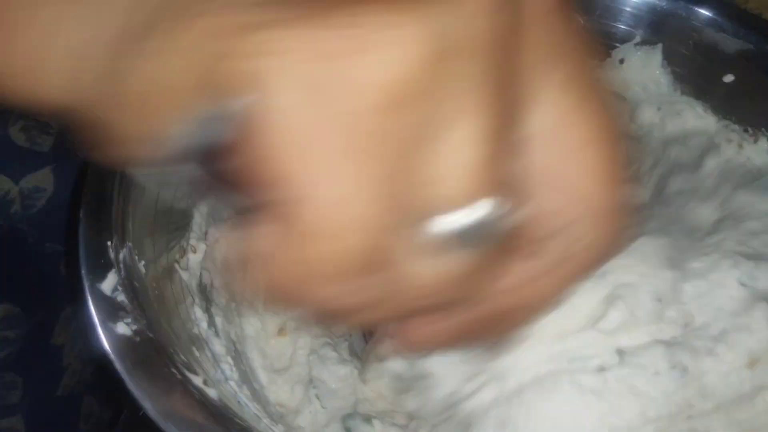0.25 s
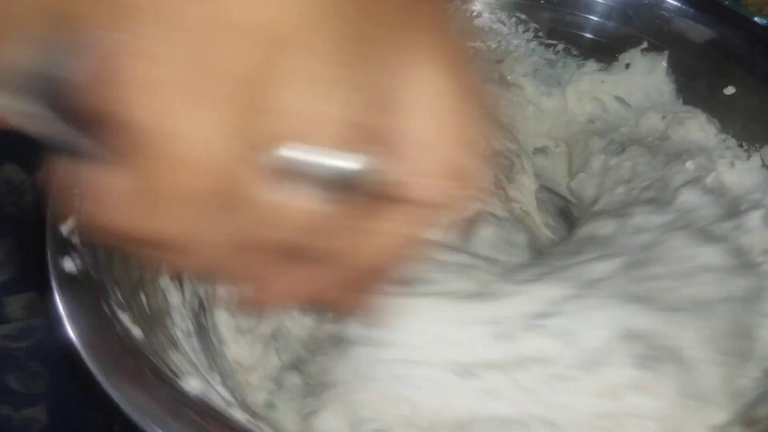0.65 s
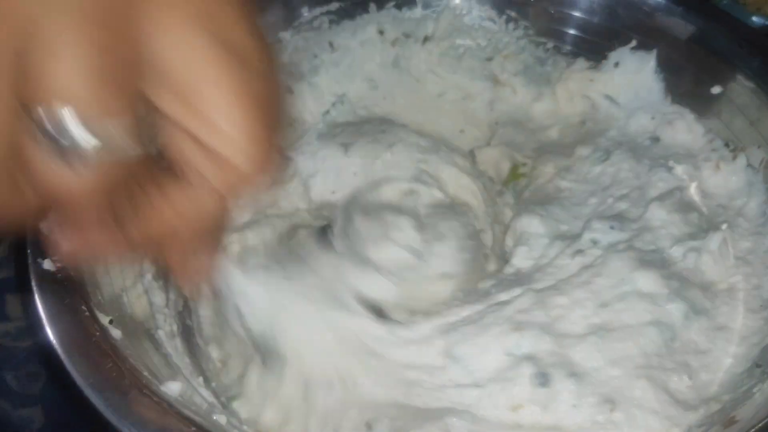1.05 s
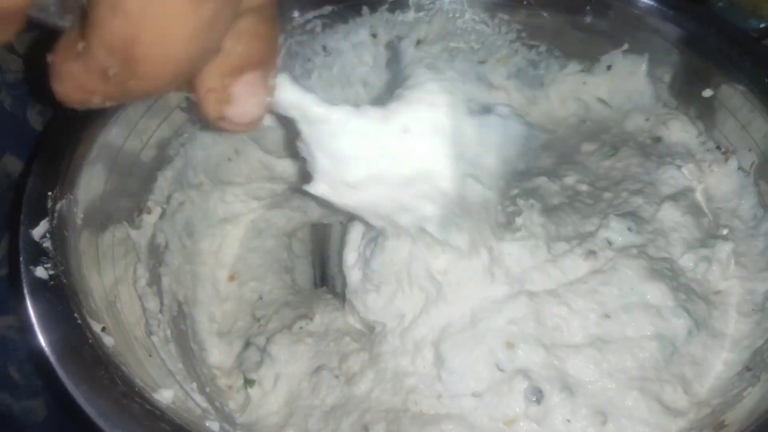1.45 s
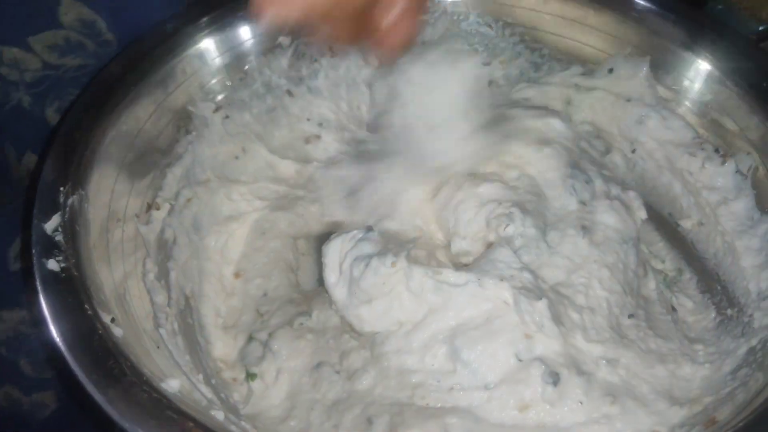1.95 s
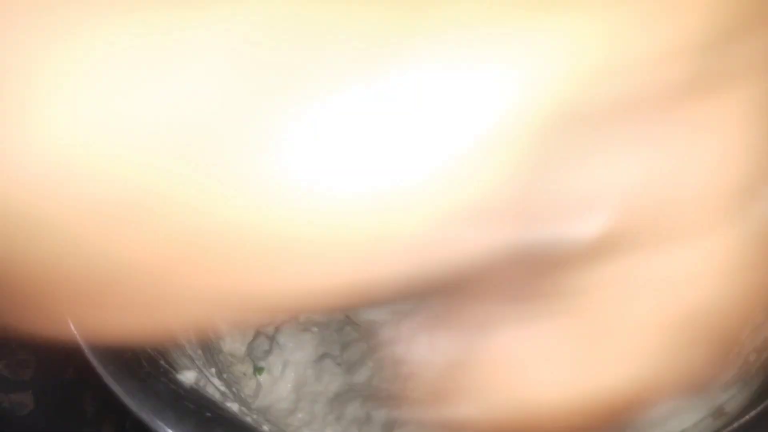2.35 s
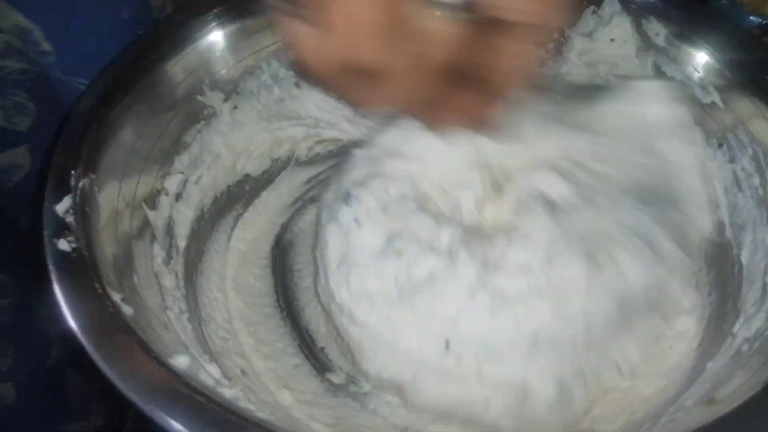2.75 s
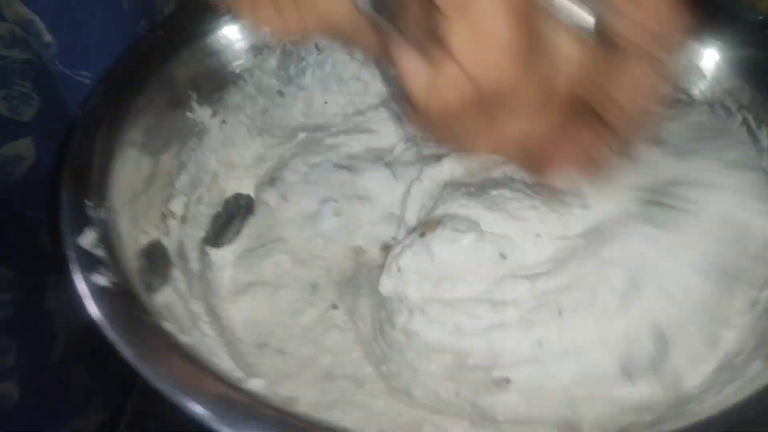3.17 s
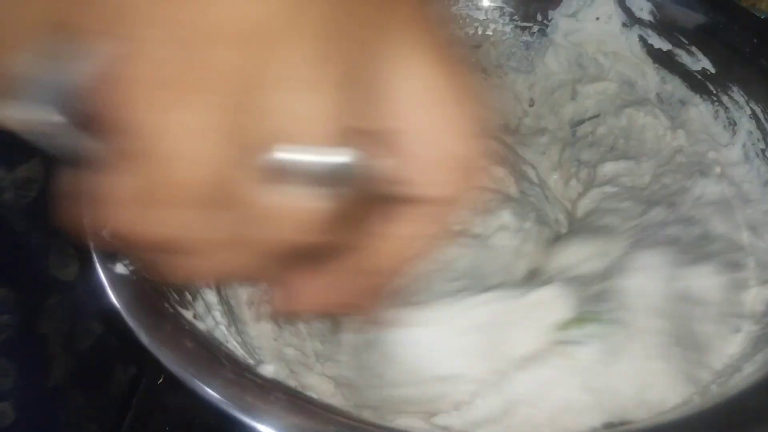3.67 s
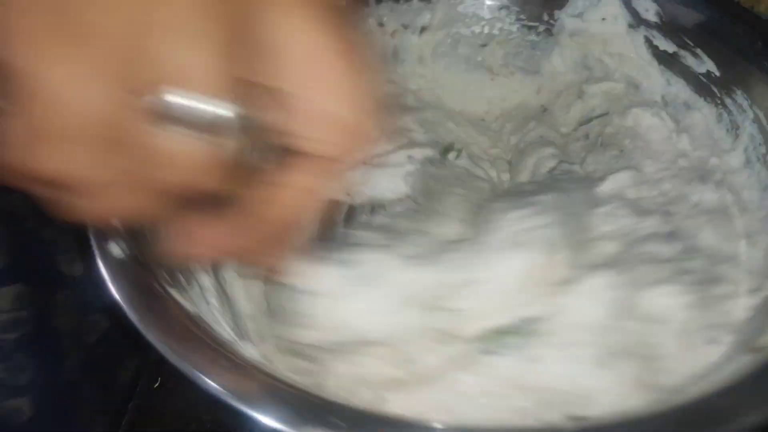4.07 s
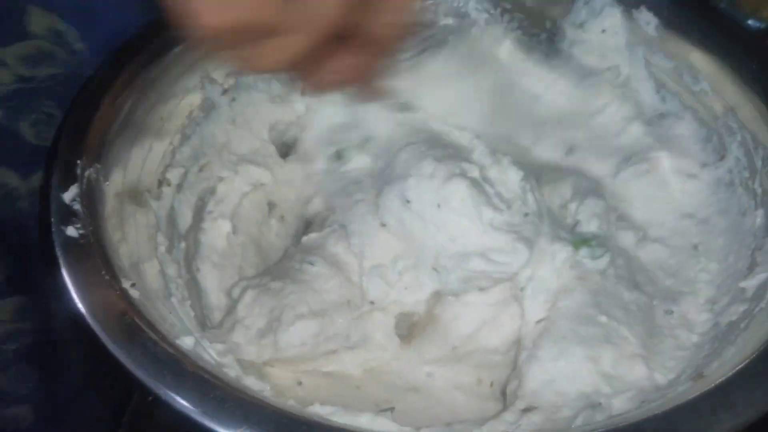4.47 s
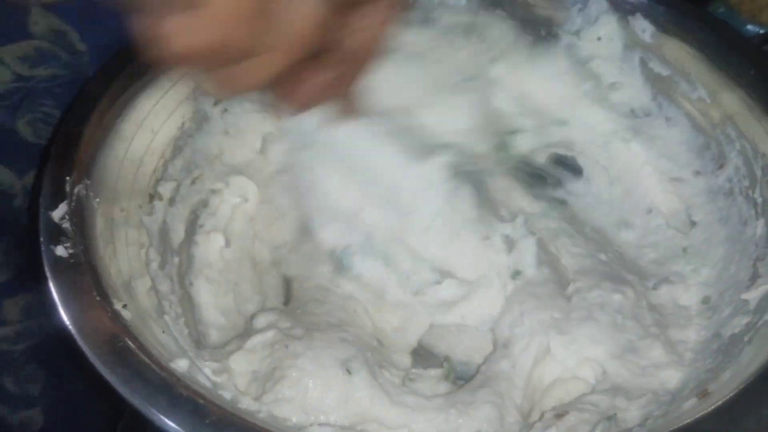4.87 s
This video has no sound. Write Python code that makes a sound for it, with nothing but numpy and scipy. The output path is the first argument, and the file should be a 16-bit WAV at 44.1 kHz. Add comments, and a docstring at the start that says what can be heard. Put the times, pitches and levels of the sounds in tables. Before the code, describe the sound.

Thick batter is whipped by hand in a batter-damped bowl. Four forceful strokes rattle and slap in the first second and a half, then lighter, irregular scrapes and ticks follow. A loud wet smack brings the beating back, stickier and less knocky. Microphones are very close; the small dry room answers briefly over quiet room tone.

```python
"""A kitchen counter, two microphones close to a steel bowl where a spoon beats thick batter.
Over a room tone, quick rattles of knocks on the damped bowl and wet smacks come first, between sweeps of
the spoon that hiss, squelch, scrape and slosh; about a second and a half in, something squeaks faintly
far away. Softer strokes follow, then wet smacks return, with batter tearing and air pockets plopping to
the end. Shaped noise makes drags and smacks, decaying sines the knocks, and the kitchen answers quietly."""
import sys
import numpy as np
from scipy import signal
from scipy.fft import rfft, irfft, next_fast_len
from scipy.io import wavfile
from scipy.ndimage import uniform_filter1d, map_coordinates

SR = 44100
rng = np.random.default_rng(int(sys.argv[2]) if len(sys.argv) > 2 else 0)


def transcribe(signal):
    """Save signal, clipped to [-1, 1], as a 16-bit WAV file at the path in sys.argv[1]."""
    frames = np.atleast_2d(signal).T
    limited = np.clip(frames, -1, 1)
    pcm = np.round(limited * 32767).astype(np.int16)
    wavfile.write(sys.argv[1], SR, pcm)


N = 226012


def amp(db):
    """Decibels to a linear factor."""
    return 10 ** (np.asarray(db) / 20)


def unit(x):
    """Scale to an RMS of one."""
    return x / np.sqrt(np.mean(x ** 2) + 1e-20)


def along(points, hz):
    """Read a curve of (frequency [Hz], value) points on a log frequency axis."""
    point_hz, value = np.transpose(points)
    return np.interp(np.log(hz + 1), np.log(point_hz + 1), value)


def wobble(rate):
    """A smooth random curve with `rate` knots a second."""
    knots = rng.standard_normal(int(N * rate / SR) + 4)
    return map_coordinates(knots, [np.arange(N) * rate / SR])


def filtered(x, response):
    """Multiply the spectrum of x by a complex response of frequency."""
    m = next_fast_len(N + SR // 2)
    return irfft(rfft(x, m) * response(np.fft.rfftfreq(m, 1 / SR)), m)[..., :N]


def gritty(colour, patchy_db, lumps):
    """Two streams of coloured noise under a lumpy gain, with small patches of pitch that come and go."""
    spectra = signal.stft(rng.standard_normal((2, N)), nperseg=256)[2]
    field = rng.standard_normal(spectra.shape[1:])
    field = uniform_filter1d(field, size=2, axis=0)  # blur over frequency
    field = uniform_filter1d(field, size=4, axis=1)  # blur over time
    pair = signal.istft(spectra * amp(patchy_db * unit(field)), nperseg=256)[1][:, :N]
    return unit(filtered(pair * lumps, colour))


# colour of the room tone: (frequency [Hz], relative level per hertz [dB])
AIR_COLOUR = [(47, -42.5), (80, -21.5), (183, -11), (977, -30.5), (1240, -24), (4290, -43.5), (5100, -23),
              (11900, -48.5), (13000, -30), (14500, -49)]
# far squeak, two gliding lines: (start time [s], start pitch [Hz], end pitch [Hz], mean level [dB])
SQUEAK_LINES = [(1.54, 1260, 1370, -80), (1.54, 1530, 1590, -70.5)]


def background():
    """Room tone is coloured noise; a faint far squeak is two unsteady sines that glide up."""
    t = np.arange(N) / SR
    noise = rng.standard_normal((2, N))
    air = amp(-74.5) * unit(filtered(noise, lambda hz: amp(along(AIR_COLOUR, hz))))
    squeak = np.zeros(N)
    for start, start_hz, end_hz, db in SQUEAK_LINES:
        progress = np.clip((t - start) / 0.157, 0, 1)  # lasts 0.157 s
        pitch = start_hz + (end_hz - start_hz) * np.sqrt(progress) + 12 * wobble(90)
        swell = np.sqrt(np.abs(np.sin(np.pi * progress)))
        squeak += amp(db + 3 * wobble(50)) * swell * np.sin(2 * np.pi * np.cumsum(pitch) / SR)
    return air + squeak


# how long the kitchen answers: (frequency [Hz], t60 [s])
KITCHEN_T60 = [(150, 0.29), (1000, 0.11), (6000, 0.14), (15000, 0.1)]


def kitchen(x):
    """Each frequency of the room's answer dies at its own speed; long waves are alike at both microphones."""
    hz, t, spectra = signal.stft(rng.standard_normal((2, SR // 2)), SR, nperseg=256)
    apart = (hz ** 2 / (hz ** 2 + 450 ** 2))[:, None]  # the sides differ above about 450 Hz
    spectra = spectra[0] + [[[1]], [[-1]]] * spectra[1] * apart
    decay = amp(-60 * t / along(KITCHEN_T60, hz)[:, None])
    tail = signal.istft(spectra * decay, SR, nperseg=256)[1]
    tail = tail / np.linalg.norm(tail[0])
    delayed = np.pad(x, (300, 0))  # 300 samples, about 7 ms
    return signal.fftconvolve(delayed[None], tail, axes=1)[:, :N]


# air pockets bursting, and bright ticks of the spoon (rows near 0.51, 0.64, 1.20 and 1.83 s): (time [s], level
# before flicker [dB], mean pitch [Hz], length [s])
PLOPS_AND_TICKS = [(.513, -22, 1350, .011), (0.637, -29, 1350, .011), (1.201, -25, 1170, 0.012),
                   (1.832, -37, 1600, 0.02), (1.55, -57.5, 770, 0.01), (3.534, -30.5, 795, 0.029),
                   (3.891, -37.5, 781, 0.028), (4.632, -24.5, 749, 0.018), (5.007, -25.5, 723, 0.023)]


def plops():
    """Each ring flutters unevenly for some 8 to 32 cycles: a trapped pocket of air bursting as its mouth
    changes shape, or a brief bright tick as the spoon strikes."""
    out, flutter = np.zeros(N + SR), wobble(250)
    for start, db, hz, length in PLOPS_AND_TICKS:
        i = round(start * SR)
        progress = np.arange(round(length * SR)) / (length * SR)
        pitch = hz * (1 + .18 * flutter[i:i + len(progress)])
        ring = np.sin(2 * np.pi * np.cumsum(pitch) / SR)
        out[i:i + len(progress)] += amp(db) * np.sin(np.pi * progress) * ring
    flicker = amp(3.6 * wobble(200))
    return out[:N] * flicker * [[1], [0]]  # direct stream only


def crackle(rate, spread_db, t60):
    """Gain spikes from tiny films of batter bursting at random: about a millisecond to swell, then a decay."""
    bursts = rng.random(N) < rate / SR
    spikes = bursts * amp(spread_db * rng.standard_normal(N))
    decays = signal.lfilter([1], [1, -amp(-60 / (t60 * SR))], spikes)
    return uniform_filter1d(decays, size=SR // 700)


POPS_PER_S, POP_HZ, POP_REACH_OCT = 260, 1900, 1.5  # pitches reach this far up and down
POP_CYCLES, POP_SPREAD_DB = 5, 5.5  # cycles per decay unit; mean lift over the softest pop


def pops():
    """Sticky bubbles each ring a few cycles on their own rising pitch; a few are much louder than the rest."""
    draw, t = rng.random((round(POPS_PER_S * N / SR), 4)), np.arange(SR // 100) / SR
    hz = POP_HZ * 2 ** (POP_REACH_OCT * (draw[:, 1:2] + draw[:, 2:3] - 1))
    u = t * hz / POP_CYCLES
    level = amp(-POP_SPREAD_DB * np.log(draw[:, 3:]))
    rings = level * u * np.exp(-3 * u) * np.sin(2 * np.pi * hz * t * (1 + .05 * u))
    at = (draw[:, :1] * N).astype(int) + np.arange(len(t))
    train = np.bincount(at.ravel(), rings.ravel(), N + len(t))[:N]
    return unit(train) * [[1], [0]]  # direct stream only


# the bowl under its load of batter: (resonance [Hz], least width [Hz], level [dB])
BOWL_MODES = [(164.6, 23, -6), (346, 91, -10.5), (523, 227, -6), (587, 31, -0.5), (675, 127, -6.5),
              (838, 109, -0.5), (975, 360, -6.5), (1103, 100, -2.5), (1590, 220, -14)]


def bowl(hz):
    """Causal sum of the bowl's resonances; the batter damps each to a quality factor of 8 at most."""
    total = 0
    for k, (centre, least_width, db) in enumerate(BOWL_MODES):
        width = max(least_width, centre / 8)
        resonance = 1j * hz * width / (centre * centre - hz * hz + 1j * hz * width)
        total = total + (-1) ** k * amp(db) * resonance  # neighbours alternate in sign
    return total


# spoon sweeps: (full-speed time [s], build-up [s], hold [s],
#                hiss level [dB], squelch level [dB], scrape level [dB], slosh level [dB])
SPOON_SWEEPS = [(0.154, 0.16, .1, -46, -46, -40.5, -46), (0.517, 0.15, 0.14, -46, -45.5, -41.5, -52.5),
                (0.862, 0.11, 0.11, -43.5, -45, -38, -46.5), (1.22, 0.14, 0.11, -47.5, -49.5, -43, -46),
                (1.428, .05, 0.047, -65, -71, -64.5, -69), (1.619, 0.011, 0.079, -83, -94, -78, -70.5),
                (1.693, 0.0081, 0.11, -49, -52.5, -57.5, -54.5), (1.838, .02, 0.081, -51, -56, -44, -59),
                (2.034, .03, 0.051, -72.5, -99, -90, -83), (2.222, 0.017, 0.018, -59, -60, -57.5, -63),
                (2.352, 0.037, 0.026, -52.5, -54, -59, -73), (2.504, 0.19, .08, -62, -61.5, -70, -80),
                (2.598, 0.027, 0.044, -48.5, -50, -50.5, -52.5), (2.707, 0.13, .06, -47.5, -56, -45, -50.5),
                (3.1, 0.16, 0.032, -47, -58.5, -50.5, -57), (3.184, 0.0073, 0.079, -54, -66, -53, -49),
                (3.402, .01, 0.041, -54, -63, -45, -53), (3.471, .08, 0.19, -43, -45.5, -45, -51.5),
                (3.93, 0.19, .1, -45.5, -48, -44, -46), (4.198, 0.14, 0.073, -56, -61.5, -60, -61),
                (4.346, 0.14, 0.12, -59.5, -64, -59.5, -62), (4.52, .02, .12, -44, -49.5, -57.5, -50),
                (4.764, 0.034, 0.046, -50, -44.5, -40.5, -60),
                (4.843, 0.089, 0.056, -42.5, -54, -47.5, -45), (4.983, 0.16, 0.03, -45.5, -43.5, -47, -56),
                (5.089, 0.013, .05, -56.5, -74, -52.5, -54.5)]
# batter tearing off the spoon: (middle time [s], length [s], wet level [dB], bowl level [dB])
BATTER_TEARS = [(0.17, 0.062, -44, -26.5), (0.271, 0.029, -34.5, -33), (0.529, 0.053, -29.5, -32),
                (0.633, 0.034, -33, -33.5), (0.859, 0.054, -35.5, -44), (0.975, 0.04, -31.5, -34.5),
                (1.232, 0.09, -37, -43.5), (1.329, 0.074, -37.5, -41.5), (1.827, .035, -40, -54),
                (2.696, 0.094, -34, -65), (3.1, .05, -42.5, -49.5), (3.215, .04, -40.5, -52),
                (3.55, 0.058, -37, -41), (3.66, 0.085, -38.5, -47), (3.942, 0.049, -40, -56.5),
                (4.029, 0.047, -34.5, -43), (4.543, 0.1, -36.5, -49.5), (4.634, 0.064, -36, -46),
                (4.776, .05, -53, -39), (4.88, 0.16, -42.5, -53.5), (5.028, 0.064, -35.5, -37.5)]
BUILD_DB = 17  # climb over one build-up
WET_FALL_DB_PER_S, BOWL_FALL_DB_PER_S = 204, 193  # dying away after the hold
TEAR_SQUELCH_DB, TEAR_SLOSH_DB = -13.5, -9.5  # while tearing: squelch over hiss, slosh over scrape


def motion():
    """Gains of hiss, squelch, scrape and slosh: a sweep climbs, holds and dies away; a tear is a smooth bump."""
    t = np.arange(0, N + 32, 32) / SR
    full, build, hold, *levels = np.transpose(SPOON_SWEEPS)[..., None]
    climb_db = BUILD_DB * np.minimum(t - full, 0) / build
    late = np.maximum(t - full - hold, 0)
    falls = [WET_FALL_DB_PER_S] * 2 + [BOWL_FALL_DB_PER_S] * 2
    sweeps = [amp(db + climb_db - fall * late) for db, fall in zip(levels, falls)]
    middle, length, wet_db, bowl_db = np.transpose(BATTER_TEARS)[..., None]
    bump = np.cos(np.pi * np.clip((t - middle) / length, -.5, .5)) ** 2
    tear_levels = (wet_db, wet_db + TEAR_SQUELCH_DB, bowl_db, bowl_db + TEAR_SLOSH_DB)
    tears = [amp(db) * bump for db in tear_levels]
    # overlapping strokes add as powers
    gains = [np.linalg.norm(np.vstack(pair), axis=0) for pair in zip(sweeps, tears)]
    return [np.interp(np.arange(N) / SR, t, gain) for gain in gains]


# colours of hiss, squelch and slosh: (frequency [Hz], relative level per hertz [dB])
HISS_COLOUR = [(1500, -16), (3000, -9), (4300, -14.5), (6500, 2), (8000, -13), (9600, -23.5), (13500, -20),
               (15800, -23.5)]
SQUELCH_COLOUR = [(800, -38), (1300, -4), (1700, -6.5), (2300, -7), (2900, -16), (3700, -24), (4600, -77.5)]
SLOSH_COLOUR = [(50, -69), (90, -50), (165, -6.5), (250, 0.5), (350, -4), (460, -7.5), (700, -39)]


def drag():
    """Batter tears with a fine hiss and a sticky squelch, the spoon's edge rubs the bowl, the mass sloshes."""
    films = crackle(rate=86, spread_db=2.5, t60=0.013)
    specks = crackle(rate=640, spread_db=4.5, t60=0.0023)
    hiss = gritty(lambda hz: amp(along(HISS_COLOUR, hz)), patchy_db=5.5,
                  lumps=1 + 1.2 * films + .6 * specks)
    squelch = gritty(lambda hz: amp(along(SQUELCH_COLOUR, hz)), patchy_db=7.5,
                     lumps=1 + 0.67 * films + 0.44 * specks)
    squelch = squelch + .7 * pops()
    scrape = gritty(bowl, patchy_db=2.5, lumps=1 + 1.2 * films)
    slosh = gritty(lambda hz: amp(along(SLOSH_COLOUR, hz)), patchy_db=2.5, lumps=amp(3.5 * wobble(45)))
    return sum(gain * layer for gain, layer in zip(motion(), (hiss, squelch, scrape, slosh)))


# wet smacks of batter parting: (time [s], burst level before colouring [dB])
WET_SMACKS = [(0.1543, -18), (0.174, -15.5), (.261, -31.5), (0.5192, -14), (.621, -30), (.8275, -39),
              (0.8445, -17), (0.8809, -18.5), (0.9529, -22.5), (1.1933, -24), (1.2072, -16.5), (1.231, -20),
              (1.3139, -37), (1.332, -26.5), (1.665, -44.5), (1.6914, -29), (1.8283, -27.5), (2.1924, -51),
              (2.2388, -32), (2.2647, -35), (2.2979, -35.5), (2.3465, -39), (2.376, -33.5), (2.6837, -34.5),
              (2.8213, -31.5), (2.9465, -65), (3.1686, -25.5), (3.1912, -45), (3.3581, -37),
              (3.3972, -33.5), (3.5396, -13.5), (3.557, -20), (3.5792, -16.5), (3.9449, -23.5),
              (4.0115, -23), (4.2552, -33), (4.401, -35.5), (4.47, -36), (4.5151, -54), (4.9707, -33.5)]


def smacks():
    """Batter parts in short bright noise bursts that swell fast and die away."""
    out, t = np.zeros((2, N + SR)), np.arange(SR // 8) / SR
    swell = 1 - np.exp(-t / 0.00027)
    bursts = rng.standard_normal((len(WET_SMACKS), 2, len(t)))
    for (start, db), burst in zip(WET_SMACKS, bursts):
        i = round(start * SR)
        out[:, i:i + len(t)] += amp(db - 60 * t / 0.034) * swell * burst  # t60 of 34 ms
    return filtered(out[:, :N], lambda hz: amp(along(HISS_COLOUR, hz)) + amp(along(SQUELCH_COLOUR, hz) + 5.5))


# knocks on the bowl: (time [s], snap level [dB], thump level before its lift [dB], settled thump pitch [Hz])
BOWL_KNOCKS = [(0.024, -29, -25.5, 241), (0.099, -23, -43.5, 278), (.171, -13.5, -32, 232),
               (.178, -4.5, -27.5, 168.6), (.184, -5, -6, 304.6), (0.539, -16.5, -13, 187),
               (.546, -3.5, -9, 345), (.638, -24.5, -25.5, 231), (0.838, -28.5, -50.5, 267),
               (.881, -10.5, -21, 200), (.891, -8.5, -13.5, 253.3), (.9, -5, -13.5, 228),
               (.952, -22.5, -22, 264.6), (1.193, -24.5, -20, 293), (1.207, -23, -37, 363),
               (1.231, -15, -13.5, 230), (1.239, -10.5, -23, 354), (1.247, -7.5, -18.5, 347),
               (1.332, -20, -27, 238.5), (1.692, -30.5, -23.5, 187), (1.84, -11, -43, 197),
               (1.938, -33, -48, 415), (2.222, -36.5, -43, 278), (2.465, -47.5, -65, 342),
               (2.506, -44.5, -52, 334), (2.7, -24, -28.5, 179), (2.716, -20.5, -40, 178),
               (2.735, -55, -20.5, 276), (2.745, -26, -30.5, 350), (2.824, -32, -50, 357),
               (2.973, -65, -32, 241), (3.166, -38.5, -32, 163), (3.191, -17.5, -18.5, 282),
               (3.397, -24.5, -22, 257), (3.419, -27.5, -31, 244), (3.579, -22.5, -19.5, 238),
               (3.595, -19.5, -26.5, 167), (3.602, -63.5, -20.5, 302), (3.73, -31.5, -45, 274),
               (3.946, -37, -16.5, 220), (3.964, -17.5, -16.5, 183), (4.029, -44, -23, 283.6),
               (4.472, -33, -41, 191), (4.518, -38.5, -35, 215), (4.719, -44, -36, 216),
               (4.843, -28.5, -28, 280), (4.894, -29, -23, 260), (4.97, -26, -26.5, 225)]
# the whole bowl rocking on the counter: (pitch [Hz], relative level [dB], t60 [s])
BOWL_ROCK = [(120, -12.5, 0.035), (153.7, -14.5, 0.097)]
SNAP_HZ, THUMP_T60_S, CRACK_T60_S = 810, 0.028, .013
CRACK_DB, THUMP_LIFT_DB = 6, 3.5  # crack noise over snap, before colouring; lift of every thump


def knocks():
    """Each knock: a crack, a one-cycle snap that rings the bowl, then the loaded wall's slow thump."""
    t = np.arange(SR // 5) / SR
    snaps, thumps, cracks = np.zeros(N + SR), np.zeros(N + SR), np.zeros((2, N + SR))
    crack_len = SR // 50
    grit = rng.standard_normal((len(BOWL_KNOCKS), 2, crack_len))
    snap = t * np.exp(-t * SNAP_HZ / 0.34) * np.sin(2 * np.pi * SNAP_HZ * t)
    snap = snap / np.abs(snap).max()
    swell = (1 - np.exp(-t / .001)) ** 2
    rock = sum(amp(db - 60 * t / t60) * np.sin(2 * np.pi * hz * t) for hz, db, t60 in BOWL_ROCK)
    for (start, db, thump_db, thump_hz), noise in zip(BOWL_KNOCKS, grit):
        i = round(start * SR)
        snaps[i:][:len(t)] -= amp(db) * snap
        cracks[:, i:i + crack_len] += amp(db + CRACK_DB - 60 * t[:crack_len] / CRACK_T60_S) * noise
        # the thump swells within milliseconds and sags in pitch as the batter settles
        cycles = thump_hz * (t + .001 * (1 - np.exp(-t / .002)))
        thump_gain = amp(thump_db + THUMP_LIFT_DB - 60 * t / THUMP_T60_S)
        thumps[i:][:len(t)] -= thump_gain * swell * np.sin(2 * np.pi * cycles)
        # doubled decibels: in effect only hard blows rock the whole bowl
        thumps[i:][:len(t)] += amp(2 * db) * swell * rock
    body = snaps[:N] + 0.9 * filtered(snaps[:N], bowl) + thumps[:N]
    return body * [[1], [0]] + filtered(cracks[:, :N], lambda hz: amp(along(SQUELCH_COLOUR, hz)))


# likeness of the two microphones for equal streams: (frequency [Hz], correlation [1])
MIC_LIKENESS = [(150, 1), (350, 0.78), (1000, 0.74), (3000, 0.29), (6000, 0.069), (14000, 0.18)]
# balance of the two microphones: (frequency [Hz], left minus right level [dB])
MIC_LEAN = [(100, -2.5), (300, 5), (600, -2.5), (1200, 5), (2500, 1), (5000, -6), (9000, -7.5), (14000, -1)]
# phase between the microphones: (frequency [Hz], lead of the left [rad])
MIC_LEAD = [(0, 0), (260, -.3), (430, -1), (690, -.5), (860, -.3), (1200, -3.1), (1720, -3.2), (2580, -6.1),
            (3960, -10.5), (8270, -21), (16000, -39.5)]


def ports(pair):
    """A direct and a scattered stream reach both microphones; the treble reaches the left one later."""
    def turn(hz):
        return np.arccos(np.clip(along(MIC_LIKENESS, hz), -1, 1)) / 2

    def tilt(hz):
        lead = np.interp(hz, *np.transpose(MIC_LEAD))
        return amp(sign * along(MIC_LEAN, hz) / 2) * np.exp(1j * sign * lead / 2)

    sign = np.array([[1], [-1]])  # left, right
    mid, side = filtered(pair, lambda hz: np.array([np.cos(turn(hz)), np.sin(turn(hz))]))
    return filtered(mid + sign * side, tilt)


def scene():
    """The close bowl and spoon, the kitchen's answer to the direct stream, and the background."""
    near = drag() + knocks() + plops() + smacks()
    return ports(near) + amp(-7.5) * kitchen(near[0]) + background()


LOW_HZ, TOP_HZ, DRONE_HZ = 85, 15750, 27.7  # bass cut, band limit, steady drone


def record(dry):
    """The microphones cut the deep bass, a very low steady drone is added, nothing stays above the band limit."""
    drone = amp(-66) * np.sin(2 * np.pi * DRONE_HZ * np.arange(N) / SR)
    bass_cut = signal.sosfilt(signal.butter(4, LOW_HZ, "high", fs=SR, output="sos"), dry)
    return filtered(bass_cut + drone, lambda hz: hz < TOP_HZ)


dry = scene()
out = record(dry)
transcribe(out)
```